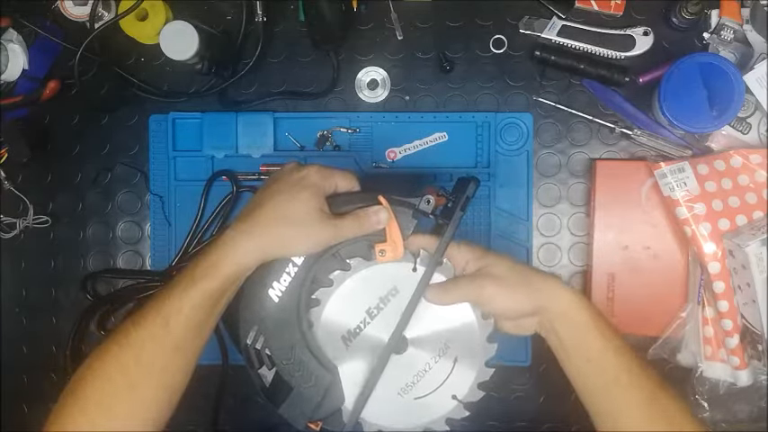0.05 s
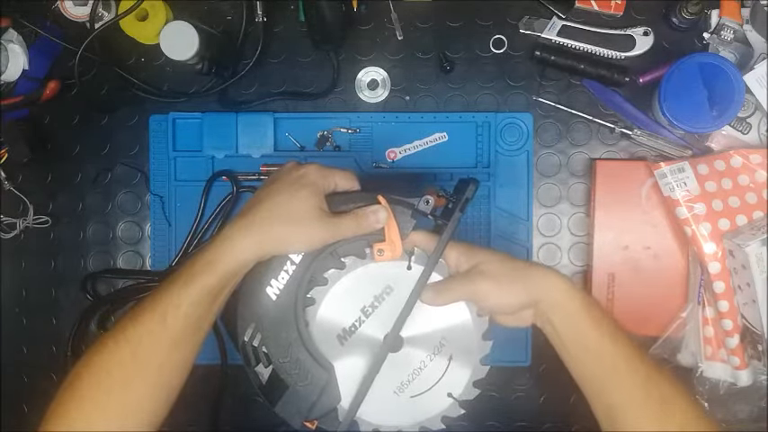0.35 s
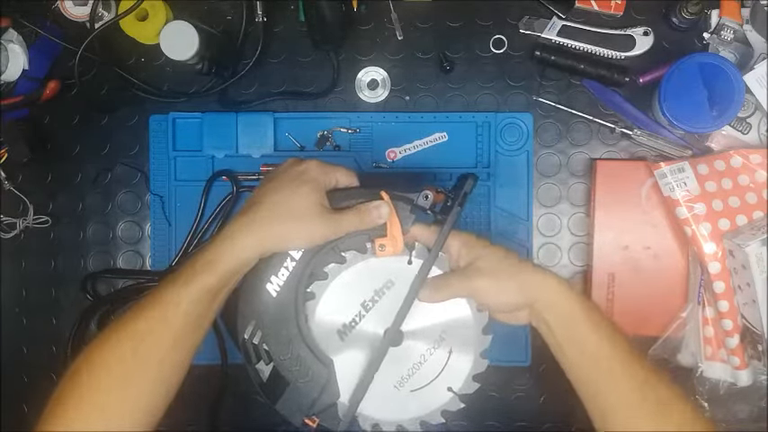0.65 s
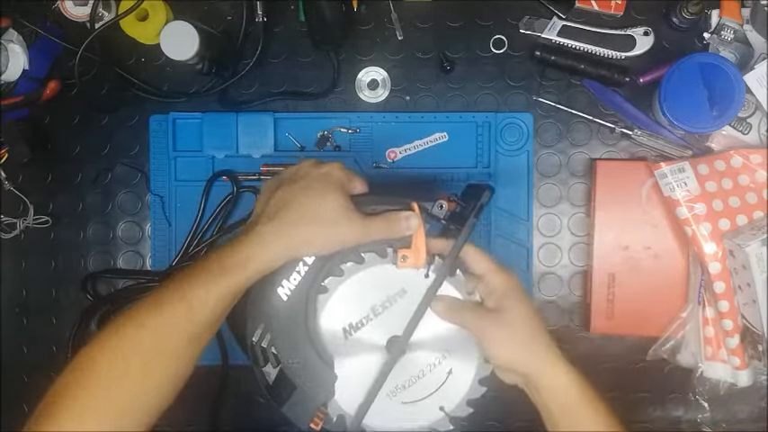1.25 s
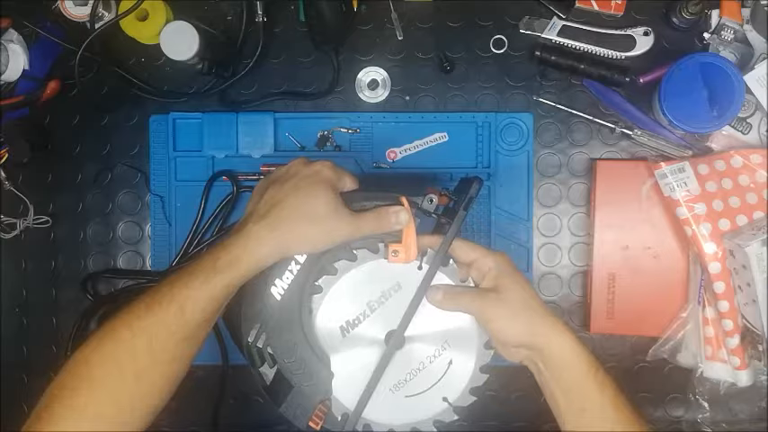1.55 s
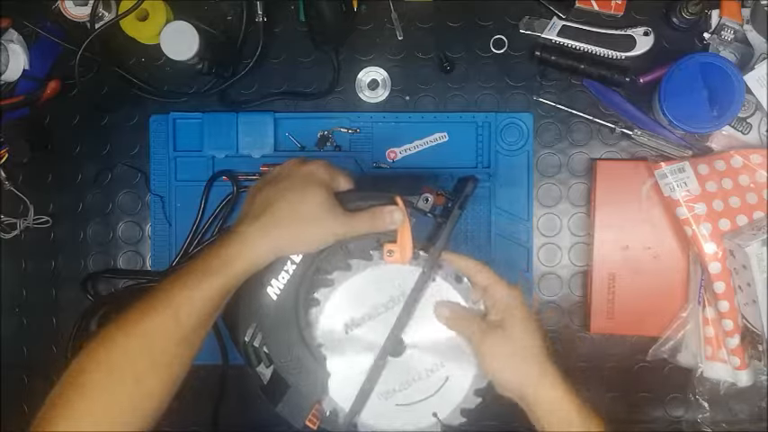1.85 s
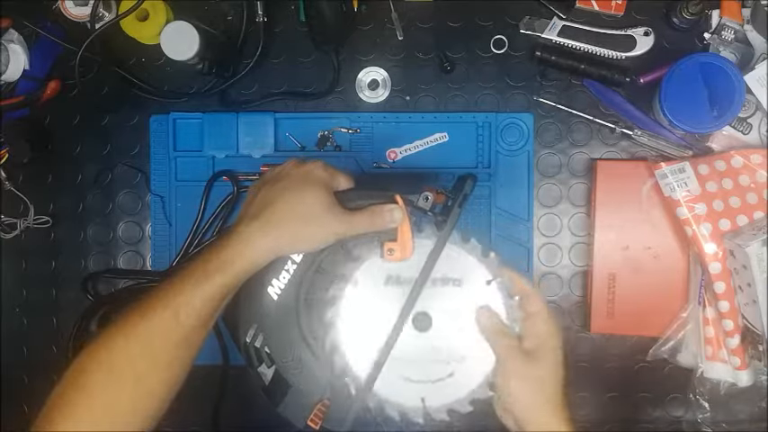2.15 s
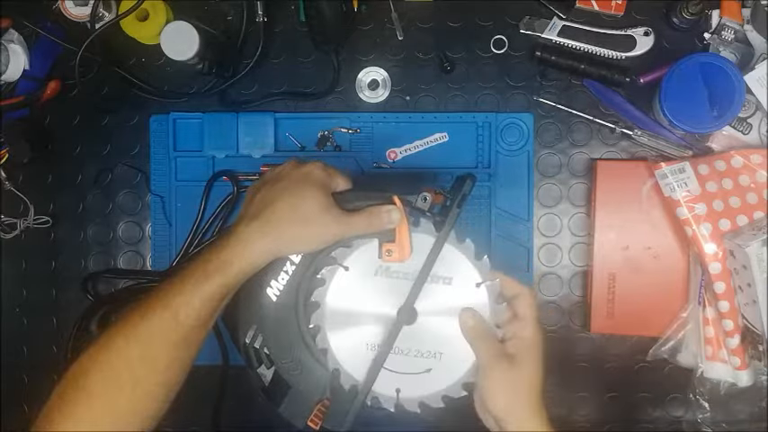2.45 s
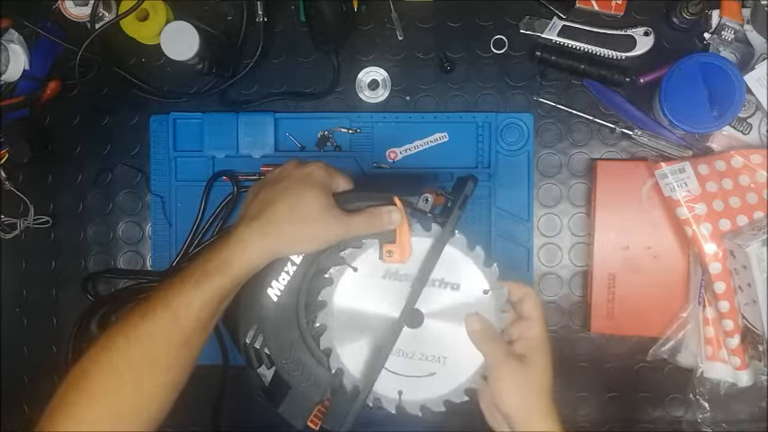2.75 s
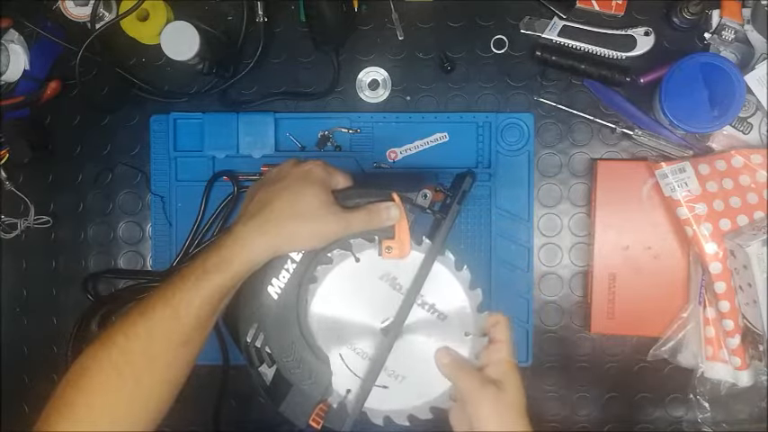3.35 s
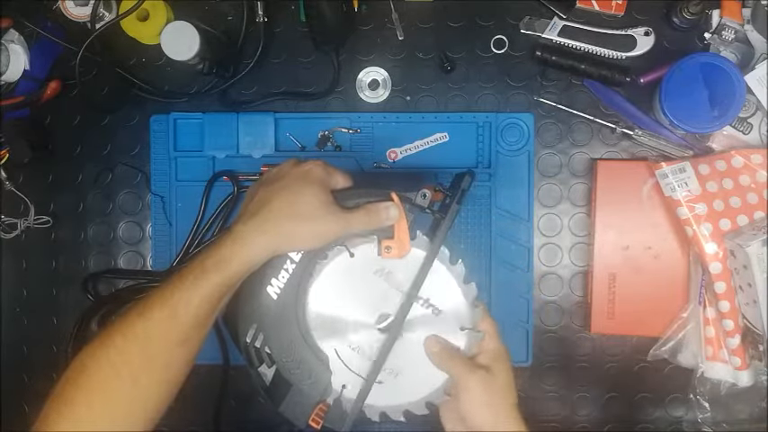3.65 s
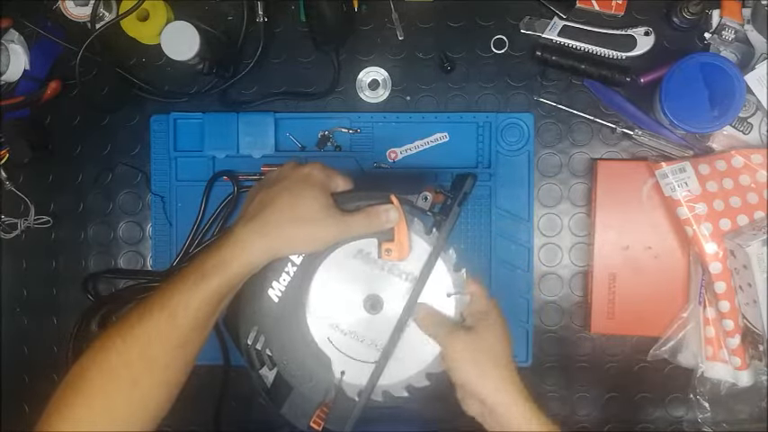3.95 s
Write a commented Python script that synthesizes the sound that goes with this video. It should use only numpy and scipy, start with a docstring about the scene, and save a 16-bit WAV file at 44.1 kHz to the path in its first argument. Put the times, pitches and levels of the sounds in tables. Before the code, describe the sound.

A circular saw blade is turned by hand in its guard, close by. Short gritty steel scrapes mix with briefly ringing clicks and knocks, the heavier ones thudding into the workbench. A small room hums faintly behind.

```python
"""Saw blade turned by hand

A circular saw blade turns in its guard on a workbench, close by. The steel drags in short gritty
strokes and knocks against arbor and guard; both forces drive the modes of blade and guard. Heavier
knocks thud in the bench. One faint squeak, one deep lurch; a small room hums behind."""
import sys
import numpy as np
from scipy import signal
from scipy.fft import rfft, irfft, next_fast_len
from scipy.io import wavfile
from scipy.ndimage import map_coordinates

SR = 44100
rng = np.random.default_rng(int(sys.argv[2]) if len(sys.argv) > 2 else 0)


def to_wav(s):
    """Save 16-bit WAV."""
    ch = np.atleast_2d(s).T  # columns
    pcm = np.round(np.clip(ch, -1, 1) * 32767)  # PCM
    wavfile.write(sys.argv[1], SR, pcm.astype(np.int16))


N = 176400
TIME_S = np.arange(N) / SR
FFT_SIZE = 8192
FREQ_HZ = np.fft.rfftfreq(FFT_SIZE, 1 / SR)
CONTACT_PAN_DB = -3.5  # hiss, groan and crack


def amp(db):
    """dB to gain."""
    return 10 ** (np.asarray(db) / 20)


def unit_rms(x):
    """Scale to rms 1."""
    return x / np.sqrt(np.mean(x ** 2) + 1e-20)


def unit_energy(h):
    """Scale a response to energy 1."""
    return h / np.linalg.norm(h, axis=-1, keepdims=True)


def log_interp(points, hz):
    """Interpolate (freq_hz, value) points on a log axis."""
    freqs_hz, values = np.transpose(points)
    return np.interp(np.log(hz + 1), np.log(freqs_hz + 1), values)


def wobble(knots_per_s):
    """Smooth random curve."""
    return map_coordinates(rng.standard_normal(int(N * knots_per_s / SR) + 4), [TIME_S * knots_per_s])


def pan(pan_db):
    """Stereo gains; pan_db is left minus right."""
    return amp(np.array([[pan_db], [-pan_db]]) / 2)


def convolve(x, h):
    """Play x through response h."""
    return signal.fftconvolve(np.atleast_2d(x), np.atleast_2d(h), axes=1)[:, :N]


def colour(points):
    """Minimum-phase response from (freq_hz, gain_db) points."""
    cepstrum = irfft(np.log(amp(log_interp(points, FREQ_HZ))))
    cepstrum[1:FFT_SIZE // 2] *= 2
    cepstrum[FFT_SIZE // 2 + 1:] = 0
    return unit_energy(irfft(np.exp(rfft(cepstrum))))


def resonances(modes):
    """Response of damped modes, alternating in sign."""
    spectrum = 0
    for k, (hz, width_hz, db) in enumerate(modes):
        damping = 1j * FREQ_HZ * width_hz
        spectrum += (-1) ** k * amp(db) * damping / (hz ** 2 - FREQ_HZ ** 2 + damping)
    return unit_energy(irfft(spectrum))


def room():
    """Low rumble, wavering hum and faint air."""
    # rumble spectrum: freq_hz, gain_db
    rumble_curve = [(12, -29.5), (22, -0.5), (66, -10), (110, -23.5), (140, -24.5), (360, -39.5),
                    (700, -57.5), (15500, -78.5)]
    # air spectrum: freq_hz, gain_db
    air_curve = [(100, -14), (400, -1.5), (2000, 2), (5000, -7), (15000, -17.5)]
    # hum bands: freq_hz, width_hz, level_db
    hum_bands = [(35.5, 10, -53), (70.9, 4.5, -61)]
    mid, side = convolve(rng.standard_normal((2, N + FFT_SIZE))[:, :N], colour(rumble_curve))
    rumble = amp(-54.5) * (mid + amp(-26.5) * np.array([side, -side]))
    hum = np.zeros(N)
    for hz, width_hz, db in hum_bands:
        phase = 2 * np.pi * hz * TIME_S
        band = wobble(2 * width_hz) * np.sin(phase) + wobble(2 * width_hz) * np.cos(phase)
        hum += amp(db) * unit_rms(band)
    air = amp(-73) * convolve(rng.standard_normal((2, N)), colour(air_curve))
    return rumble + hum + air


def grit(slips_per_s=5000, spread_db=3.5, judder_db=3.5, judder_per_s=130):
    """Friction force: dense tiny slips of uneven size, bunched by judder."""
    slips = (rng.random(N) < slips_per_s / SR) * rng.choice([-1, 1], N)
    sizes = amp(spread_db * rng.standard_normal(N))
    return unit_rms(slips * sizes * amp(judder_db * wobble(judder_per_s)))


def travelling_contact(force, depth_db=5.5, band_hz=169.6, step_s=0.11, full_depth_hz=3100):
    """The moving contact favours changing modes, differently at each ear."""
    hz, t, spectra = signal.stft(force, SR, nperseg=1024)
    mid, side = rng.standard_normal((2, int(hz[-1] / band_hz) + 2, int(t[-1] / step_s) + 2))
    grid = np.meshgrid(hz / band_hz, t / step_s, indexing='ij')
    field = np.array([map_coordinates(ear, grid, order=1) for ear in (mid + side / 2, mid - side / 2)])
    gain_db = depth_db * np.tanh(3.5 * field) * np.minimum(hz / full_depth_hz, 1)[:, None]
    return unit_rms(signal.istft(spectra * amp(gain_db), SR, nperseg=1024)[1][:, :N])


def drags(release_db_per_s=424.5):
    """Steel drags in strokes: friction forces for rub, hiss, singing and groan."""
    # blade strokes: start_s, length_s, rise_s, level_db, slope_db, hiss_db, sing_db, groan_db, pan_db
    strokes = [ (0.003, 0.023, 0.059, -43, -12, -11, 3, -25, 4),
               (0.075, 0.068, .02, -58.5, -9.5, -17.5, -0.5, -12, -2),
               (0.411, 0.13, 0.19, -72, -2.5, -13, 2, -20, 1.5),
               (0.734, 0.047, .04, -67.5, 0.5, -2.5, -4, -9, -1),
               (0.996, 0.083, 0.13, -54, -2, -10.5, -17, -15, -6),
               (1.171, .035, 0.018, -59, 7, -10, 0.5, -15, 1), (1.25, 0.15, .03, -73.5, -5, 2.5, 9, -22, 2),
               (1.365, 0.068, 0.062, -40.5, -5, -7, 6, -17.5, 0),
               (1.574, 0.021, 0.014, -49, 6, -8, -2, -8, 2),
               (1.589, 0.072, 0.02, -46, -20.5, -6, 3, -2, -3),
               (1.839, 0.12, 0.027, -43.5, 4.5, -10.5, -2, -23, 0.5),
               (2.008, .02, .015, -54.5, -2, -10, -2, -3, 4),
               (2.036, 0.11, 0.031, -44.5, -0.5, -2.5, -17, -5.5, -7),
               (2.157, 0.045, 0.035, -53, -4, -4.5, -10, -3, 15),
               (2.234, 0.027, 0.0069, -36, -5, -6.5, -12, -10, -8.5),
               (2.35, 0.068, 0.068, -37, -1.5, -9, 0.5, -17, 2),
               (2.527, .015, .03, -76, -20, 13.5, -2, -10, 7),
               (2.571, 0.026, 0.024, -45, -22.5, -8.5, 10, -12.5, 3),
               (2.788, 0.051, .03, -52.5, -7.5, -2.5, 2, -22, -3.5),
               (2.878, 0.035, .03, -41, -3.5, -7, -2, -17.5, 0),
               (3.087, 0.068, 0.082, -42.5, 0.5, -11.5, -5, -16.5, -2),
               (3.184, 0.039, 0.018, -41.5, 1.5, -6, 8, -22, 2),
               (3.361, 0.044, 0.066, -45.5, 0.5, -8.5, 8.5, -14, 5.5),
               (3.439, 0.046, 0.12, -40.5, 0, -3, 0, -11, 2),
               (3.535, 0.026, 0.038, -68.5, 7, 0, -12, 5.5, 2),
               (3.631, 0.097, .05, -68, -14.5, 6, -3, -16.5, -3),
               (3.794, 0.075, 0.019, -43.5, 3, 0, 7, 1.5, 0),
               (3.861, 0.036, 0.047, -28.5, -6, -1, -8, -4.5, 0),
               (3.888, 0.067, 0.036, -40.5, -3, -11.5, -10, -6, 6)]
    power = np.zeros((4, 2, N))
    for start_s, length_s, rise_s, level_db, slope_db, hiss_db, sing_db, groan_db, pan_db in strokes:
        t = TIME_S - start_s
        attack_db = 30 * np.minimum(t, 0) / rise_s
        ramp_db = slope_db * np.clip(t / length_s, 0, 1)
        release_db = release_db_per_s * np.clip(t - length_s, 0, 0.5)
        envelope = amp(level_db + attack_db + ramp_db - release_db)
        gains = np.array([pan(pan_db), amp(hiss_db) * pan(CONTACT_PAN_DB),
                          amp(sing_db) * pan(pan_db), amp(groan_db) * pan(CONTACT_PAN_DB)])
        power += (gains * envelope) ** 2
    friction = [travelling_contact(grit()), travelling_contact(grit()), [grit()] * 2, [grit()] * 2]
    return np.sqrt(power) * np.array(friction)


def knocks(attack_s=0.00096, fade_db_per_s=856.5, crack_db_per_s=1500, ring_t60_s=0.23):
    """Steel hits the guard, chatters and rings one mode: blow and crack forces, and the ring."""
    # knocks on the guard: start_s, level_db, chatter_s, crack_db, ring_hz, ring_db, pan_db
    hits = [ (0.678, -52.5, 0.0029, -42, 1220, -13, -4.5), (0.775, -58.5, .004, 3.5, 1625, 0, -6),
            (0.984, -51, 0.0041, -20, 1793, 4, 4), (1.01, -58.5, .002, 4.5, 1810, -14, 2),
            (1.030, -51.5, 0.0036, -25, 1825, 6.5, 4), (1.055, -36, 0.0016, -28, 1860, 1, 1.5),
            (1.113, -39.5, 0.0037, -31, 1587, -1.5, -4), (1.163, -38.5, 0.0035, -7, 1907, -11, -4.5),
            (1.357, -51.5, 0.017, -20, 1795, 17, 2.5), (1.411, -35.5, 0.008, -6.5, 1770, 6.5, 4),
            (1.423, -39.5, 0.0035, -7.5, 1910, 4, 0), (1.432, -24, 0.0023, -23, 1253, -7.5, -0.5),
            (1.598, -23, 0.00092, -6, 1933, -7, 0.5), (1.607, -39, .001, -32.5, 1760, -25.5, -4.5),
            (1.8367, -28.5, 0.003, -10.5, 1797, -1.5, 0), (1.853, -32.5, 0.0072, -9, 1814, -9, -3),
            (2.036, -42, 0.012, 3, 1885, -2, -4), (2.05, -28, 0.0067, -18, 1627, -19, -2),
            (2.082, -44.5, 0.0067, 6, 1600, -5, 5.5), (2.148, -23.5, 0.0017, -7.5, 2600, -12.5, -2),
            (2.155, -32, 0.0072, -15.5, 1605, 4.5, -3.5), (2.235, -40, 0.012, -14.5, 1954, -5, 7),
            (2.3304, -23, 0.0097, -14.5, 1616, 8.5, -3), (2.769, -52, 0.0036, -13, 1793, 5.5, 6.5),
            (2.814, -36, 0.0041, -7.5, 1748, -2.5, -0.5), (2.872, -53.5, 0.0041, -9, 1865, 6.5, 12),
            (3.171, -24.5, 0.0013, -14, 1830, -17, -2), (3.212, -33, 0.0027, -9.5, 1792, 4.5, 3),
            (3.506, -38, 0.006, -23.5, 1753, 3, -1), (3.851, -46, 0.004, -20, 1218, 15.5, -0.5),
            (3.963, -54.5, .003, 2.5, 7500, 6, -15), (3.978, -27.5, 0.0023, -9.5, 1845, -6, -2.5)]
    blow, crack, ring = np.zeros((3, 2, N + SR))
    t = np.arange(SR // 3) / SR
    lead_s = np.array([[0.00005], [0]])  # ring reaches the left ear first
    after_ring = amp(-23.5 - 60 * t / ring_t60_s)
    crack_fade = amp(5.5 - crack_db_per_s * t)
    for start_s, level_db, chatter_s, crack_db, ring_hz, ring_db, pan_db in hits:
        span = slice(int(start_s * SR), int(start_s * SR) + len(t))
        onset = amp(level_db) * (1 - np.exp(-t / attack_s))
        fade = amp(-fade_db_per_s * np.maximum(t - chatter_s, 0))
        chatter, crack_noise, phase_noise = rng.standard_normal((3, len(t)))
        force = onset * fade * chatter
        force[int(2 * attack_s * SR)] += amp(level_db + 18)  # first contact
        blow[:, span] += pan(pan_db) * force
        crack[:, span] += pan(CONTACT_PAN_DB) * amp(crack_db) * onset * crack_fade * crack_noise
        tone = np.sqrt(2) * np.sin(2 * np.pi * ring_hz * (t + lead_s) + 0.027 * np.cumsum(phase_noise))
        ring[:, span] += pan(pan_db) * amp(ring_db) * onset * (fade + after_ring) * tone
    return blow[:, :N], crack[:, :N], ring[:, :N]


def radiate(force, response, wet_db, segments=10):
    """Force through a response, with a diffuse ring that differs per ear and as the blade moves."""
    # diffuse decay of plate and room: freq_hz, t60_s
    decay_curve = [(200, 0.49), (1500, 0.1), (4000, .13), (10000, 0.1)]
    out = np.zeros((2, N + 2 * FFT_SIZE))
    for span in np.array_split(np.arange(N), segments):
        hz, t, spectra = signal.stft(rng.standard_normal((2, FFT_SIZE)), SR, nperseg=256)
        decay = amp(-60 * t / log_interp(decay_curve, hz)[:, None])
        tail = amp(wet_db) * unit_energy(signal.istft(spectra * decay, SR, nperseg=256)[1])
        tail[:, 0] += 1  # direct path
        piece = convolve(force[:, span], unit_energy(convolve(response, tail)))
        out[:, span[0]:span[0] + piece.shape[1]] += piece
    return out[:, :N]


def blade():
    """Drags and knocks sound through the same steel and the guard around it."""
    # spectrum of the blade in its guard: freq_hz, gain_db
    body_curve = [(100, -22.5), (180, -19), (280, -16.5), (450, -12), (600, -14.5), (780, -17), (1030, -10),
                  (1430, -13), (1650, 3), (2000, 1), (2250, -2.5), (2600, -3.5), (3400, -13.5),
                  (4200, -21.5), (6000, -23), (16000, -69)]
    # spectrum of the gritty contact: freq_hz, gain_db
    hiss_curve = [(500, -40), (3000, -10), (3700, 5.5), (4250, -7), (4800, -0.5), (5600, 1), (6400, 1),
                  (7700, 1.5), (8500, 0.5), (9600, -1.5), (11000, -11), (13000, -16.5), (15500, -30)]
    # blade bending modes: freq_hz, width_hz, gain_db
    plate_modes = [(992, 29, -8.5), (1078, 33, -0.5), (1275, 50, -5), (1368, 35, -2), (1615.4, 25, 4),
                   (1738, 50, 4), (1928, 59, 0), (2033, 35, -1.5), (2430, 13, -4), (2542, 30, -4),
                   (2623, 95, -4.5), (2780, 25, -3), (2995, 89, -5), (3366, 41, -9)]
    # high steel modes: freq_hz, width_hz, gain_db
    steel_modes = [(3800, 20, 1.5), (4580, 30, -1), (5290, 40, -22), (5480, 30, -9), (5600, 50, 2),
                   (6440, 40, 5.5), (6800, 75, -0.5), (7780, 50, 12.5), (7840, 80, 8.5), (9500, 16, -5.5),
                   (8760, 60, -10), (11110, 51, -6)]
    # singing modes: freq_hz, width_hz, gain_db
    sing_modes = [(1495, 25, -14.5), (1756.5, 49, 1), (1829, 63, 3), (1941, 47, -3.5), (2450, 44, -11)]
    # groaning modes: freq_hz, width_hz, gain_db
    groan_modes = [(1085, 30, 5.5), (1189, 60, 3), (1309, 22, 6.5), (2986, 33, 4)]
    # hollow guard modes: freq_hz, width_hz, gain_db
    guard_modes = [(177.4, 13, -2), (345.7, 15, -3), (462, 20, -0.5), (615, 61, -10)]
    rub, hiss, sing, groan = drags()
    blow, crack, ring = knocks()
    bright = unit_energy(colour(hiss_curve) + amp(-4.5) * resonances(steel_modes))
    return (radiate(amp(-2) * (rub + blow), colour(body_curve), wet_db=-1)
            + radiate(amp(-4) * (rub + blow), resonances(plate_modes), wet_db=-7.5)
            + radiate(hiss, bright, wet_db=5.5)
            + radiate(crack, bright, wet_db=0.5, segments=4)
            + radiate(sing, resonances(sing_modes), wet_db=-7.5)
            + convolve(groan, resonances(groan_modes))
            + convolve(amp(-20) * blow + amp(-29.5) * rub, resonances(guard_modes))
            + ring)


def mode_swell(peak_s, half_width_s, pitch_hz, level_db):
    """One wavering mode swells and fades."""
    envelope = amp(level_db) * np.exp(-((TIME_S - peak_s) / half_width_s) ** 2)
    return envelope * np.sqrt(2) * np.sin(2 * np.pi * pitch_hz * TIME_S + 2 * wobble(pitch_hz / 14))


def bench(mode_hz=69.7, rise_s=0.009, t60_s=0.26):
    """The bench top bounces at one low mode."""
    # bench thuds: start_s, level_db
    thuds = [(1.05, -50.5), (1.623, -40), (1.85, -46.5), (2.054, -39), (2.16, -32), (2.241, -39),
             (2.344, -35), (2.81, -49), (3.21, -42.5), (3.5, -40), (3.87, -44), (3.94, -44)]
    out = np.zeros(N)
    for start_s, level_db in thuds:
        t = np.maximum(TIME_S - start_s, 0)
        envelope = 2 * amp(level_db - 60 * t / t60_s) * (1 - np.exp(-t / rise_s))
        out += envelope * np.sin(2 * np.pi * mode_hz * t)
    return out


def scene():
    """Room, blade with one faint squeak, bench with one deep lurch."""
    squeak = mode_swell(peak_s=0.91, half_width_s=0.02, pitch_hz=3950, level_db=-70.5)
    lurch = mode_swell(peak_s=3.52, half_width_s=0.04, pitch_hz=36, level_db=-37)
    return blade() + squeak + bench() + lurch + room()


def record(dry):
    """Brick-wall low-pass."""
    cutoff_hz = 15700
    size = next_fast_len(N + FFT_SIZE)
    passband = np.fft.rfftfreq(size, 1 / SR) < cutoff_hz
    return irfft(rfft(dry, size) * passband, size)[:, :N]


dry = scene()
out = record(dry)
to_wav(out)
```